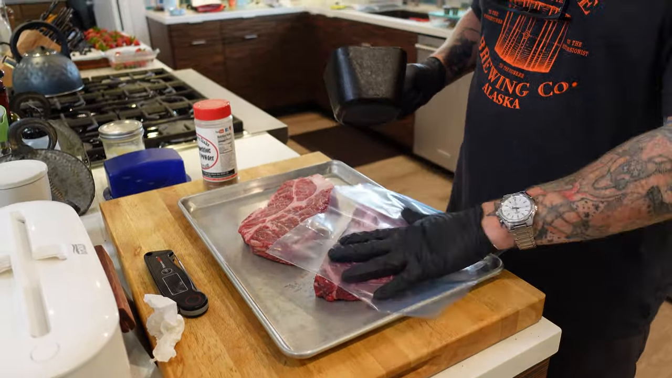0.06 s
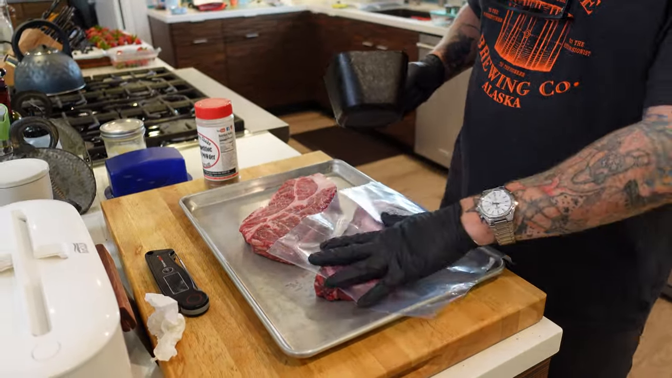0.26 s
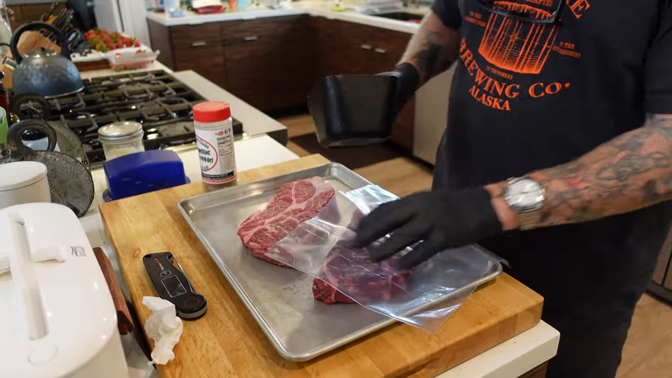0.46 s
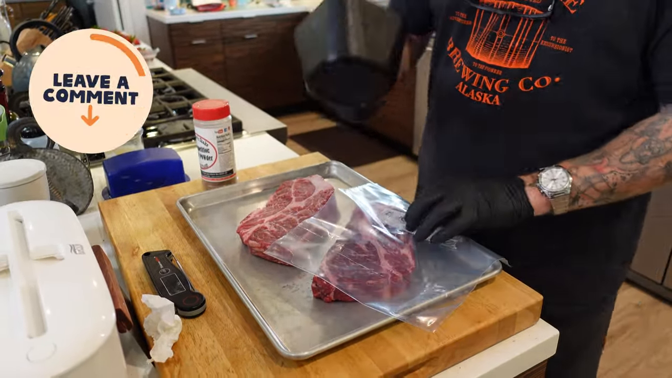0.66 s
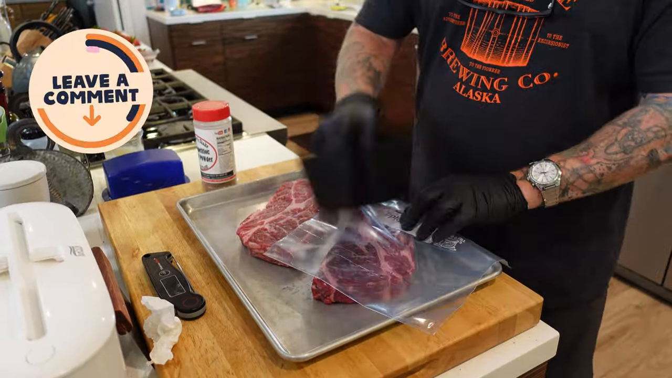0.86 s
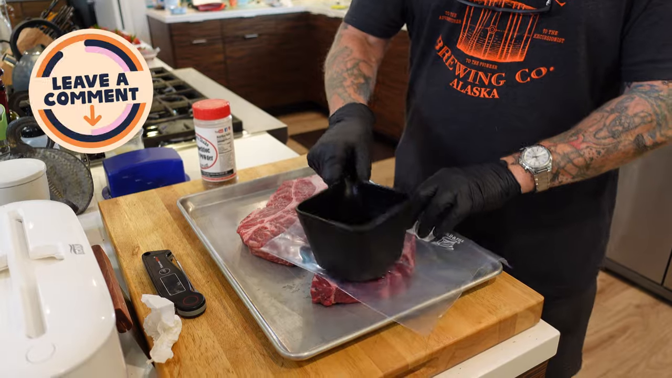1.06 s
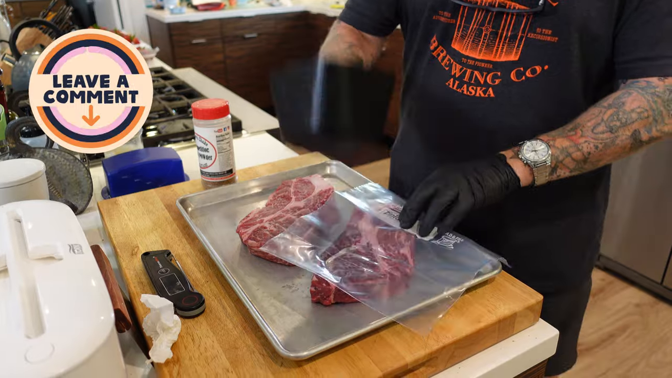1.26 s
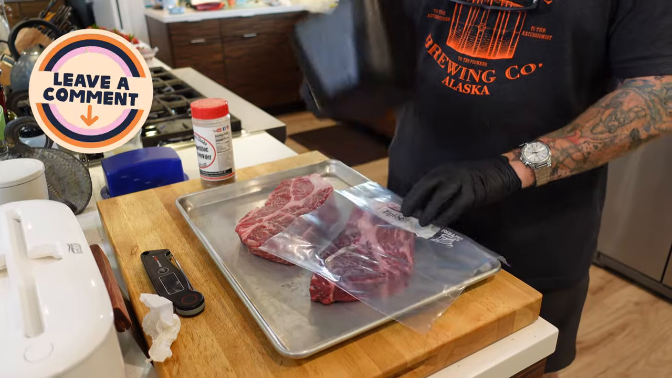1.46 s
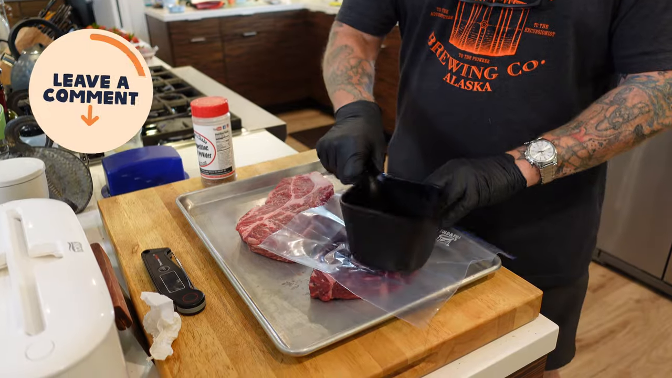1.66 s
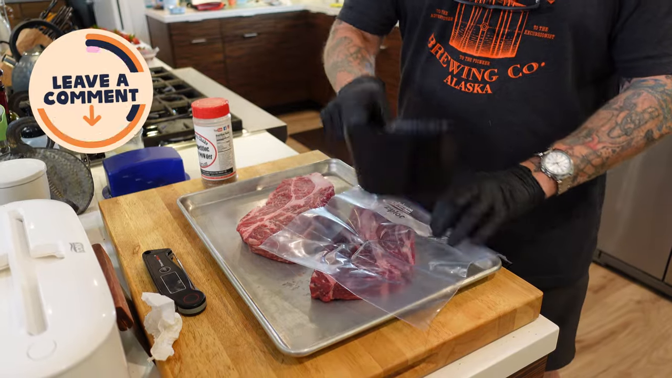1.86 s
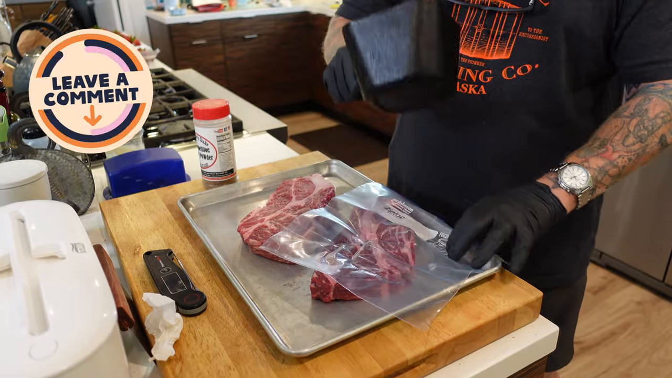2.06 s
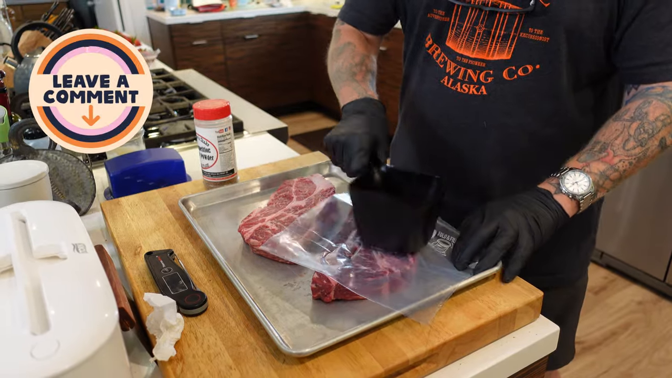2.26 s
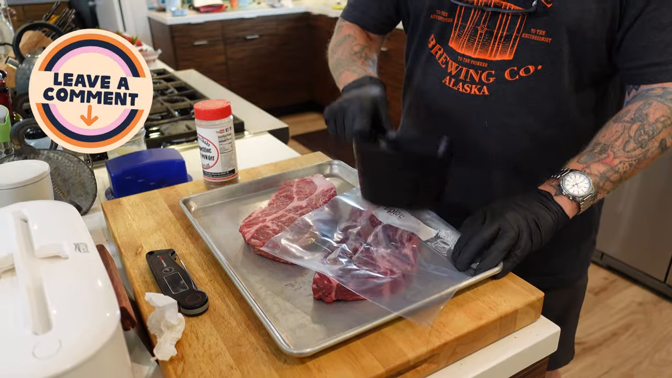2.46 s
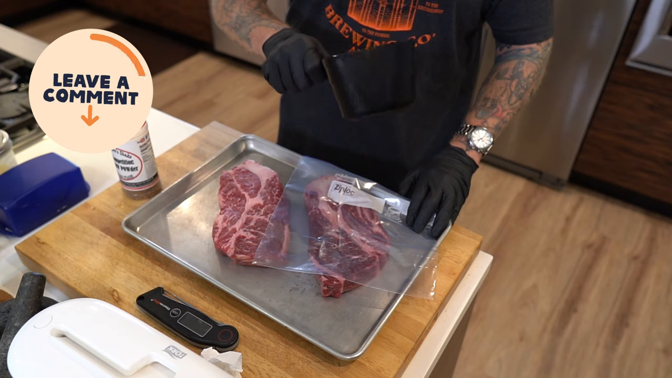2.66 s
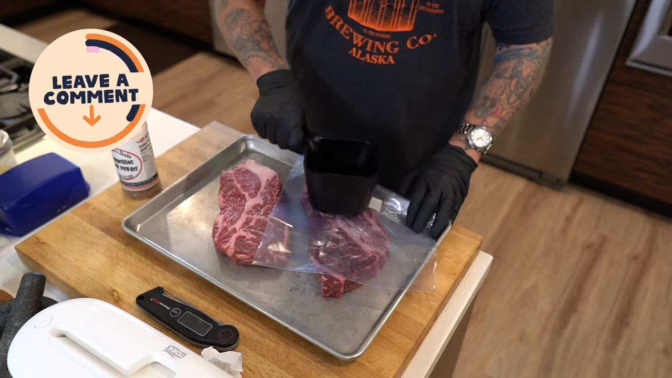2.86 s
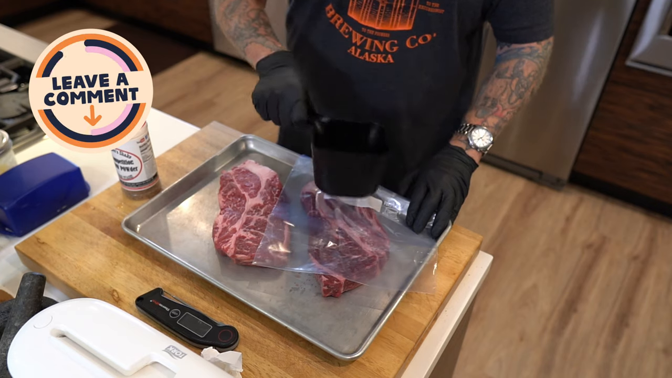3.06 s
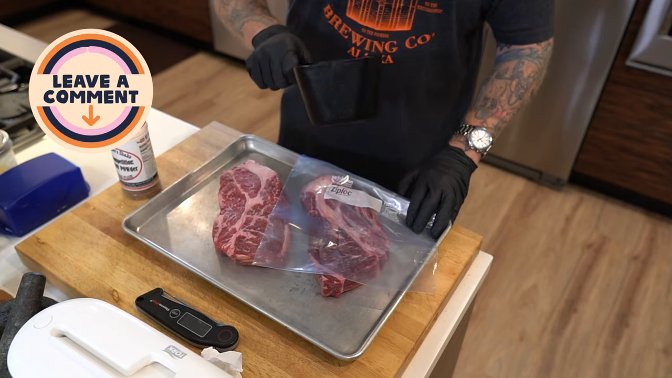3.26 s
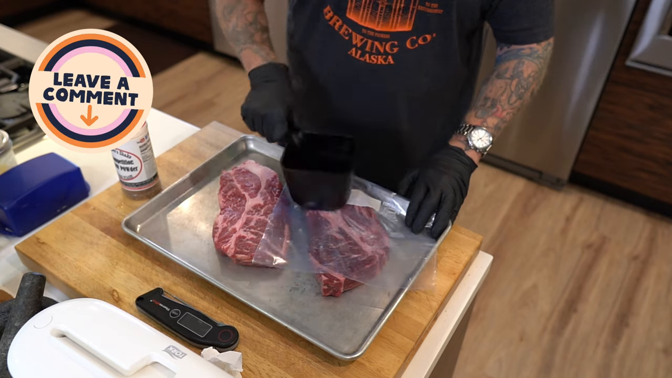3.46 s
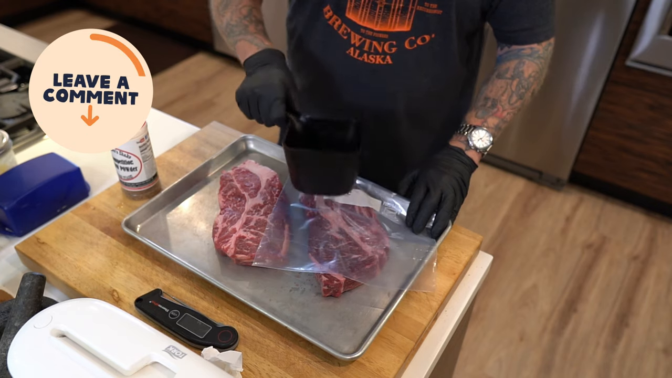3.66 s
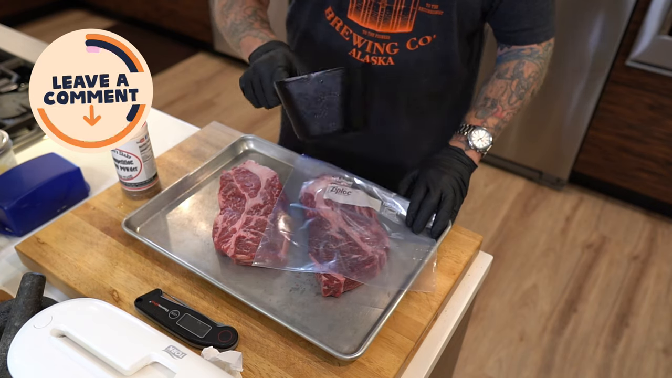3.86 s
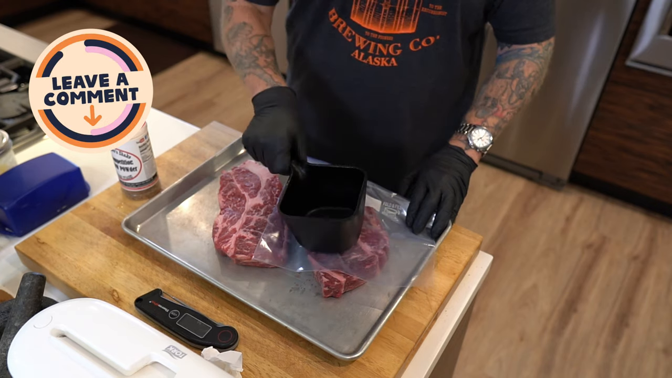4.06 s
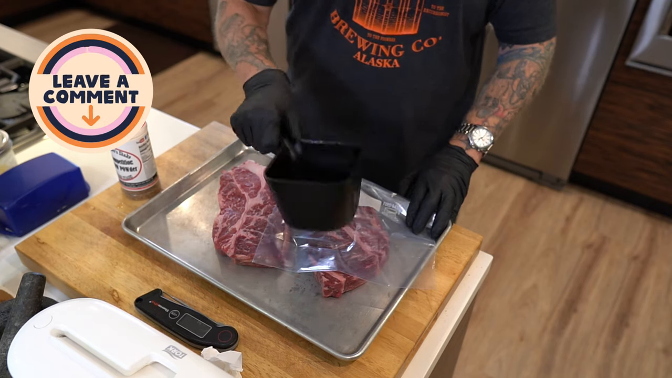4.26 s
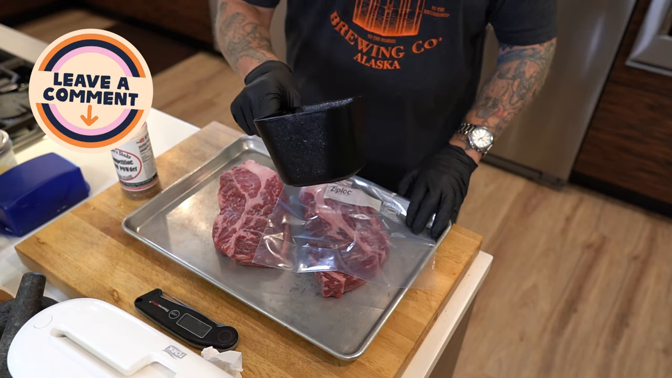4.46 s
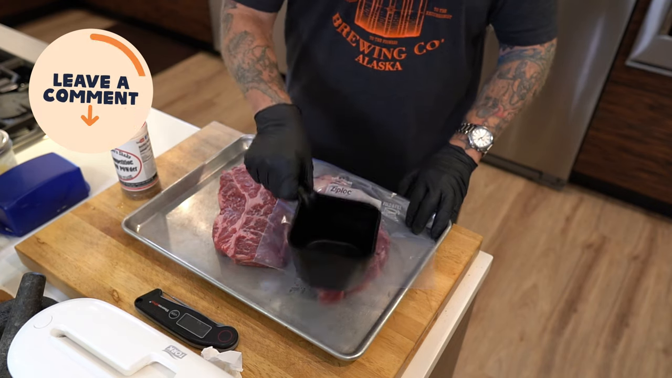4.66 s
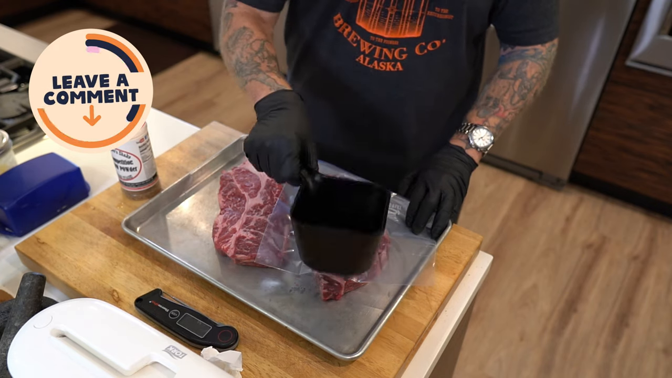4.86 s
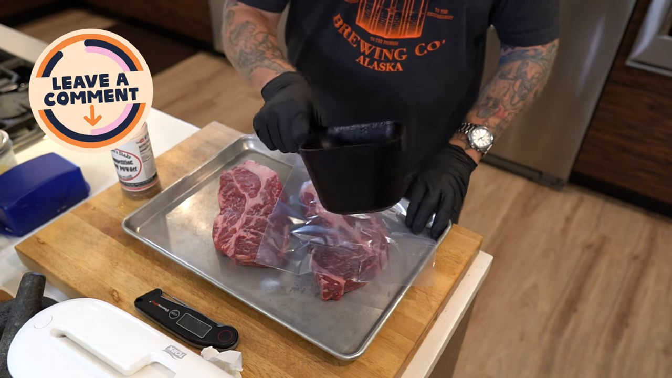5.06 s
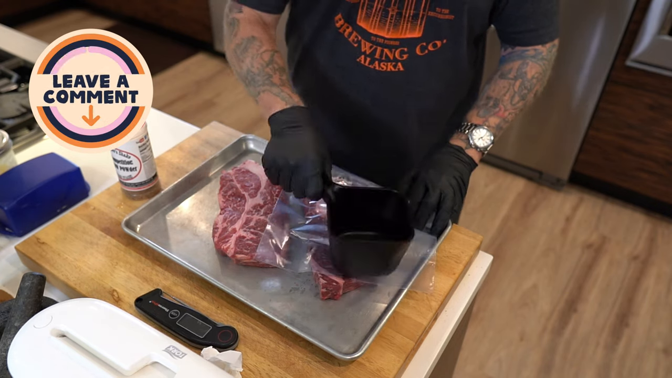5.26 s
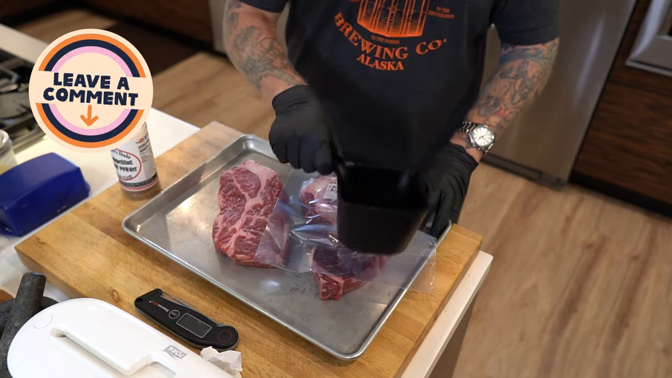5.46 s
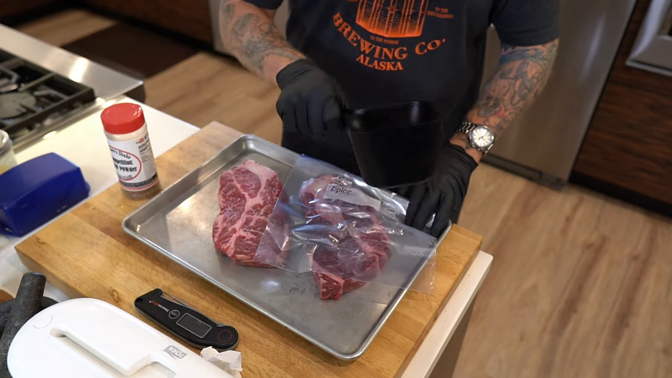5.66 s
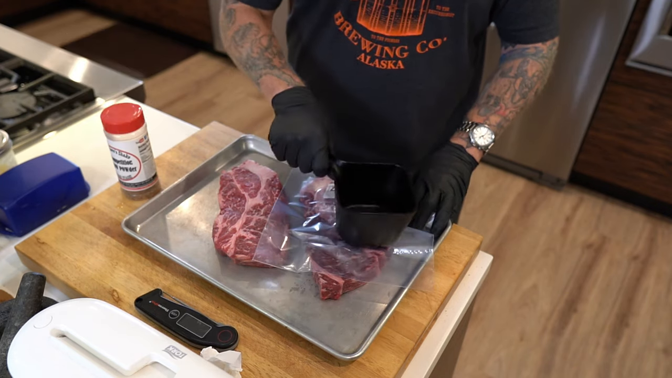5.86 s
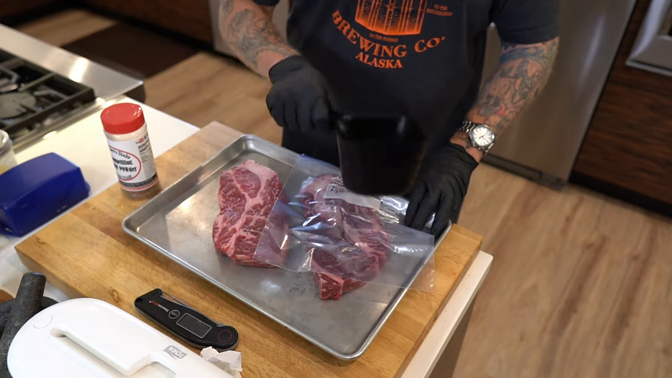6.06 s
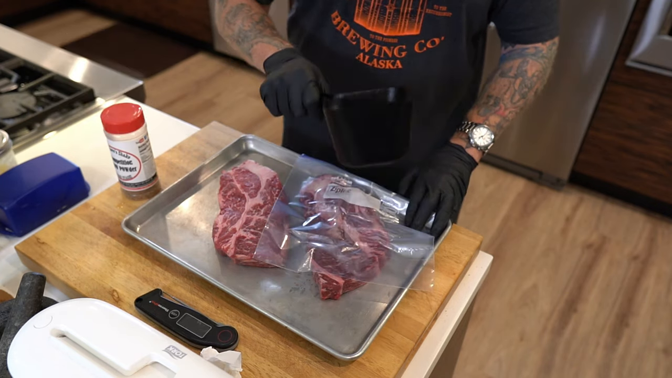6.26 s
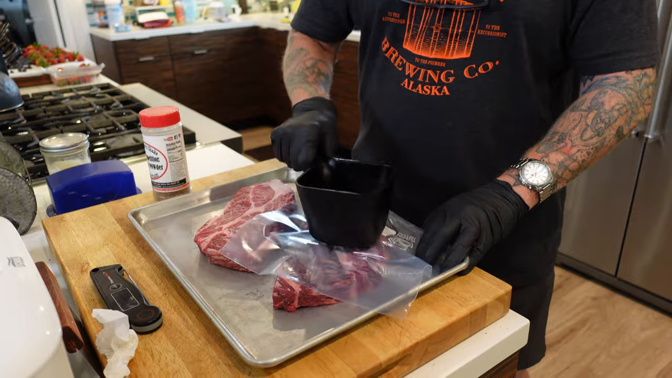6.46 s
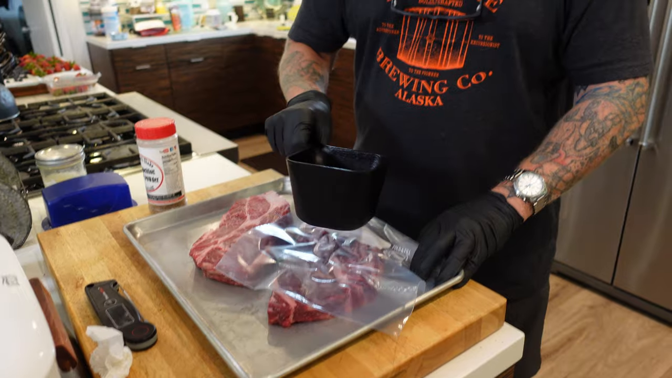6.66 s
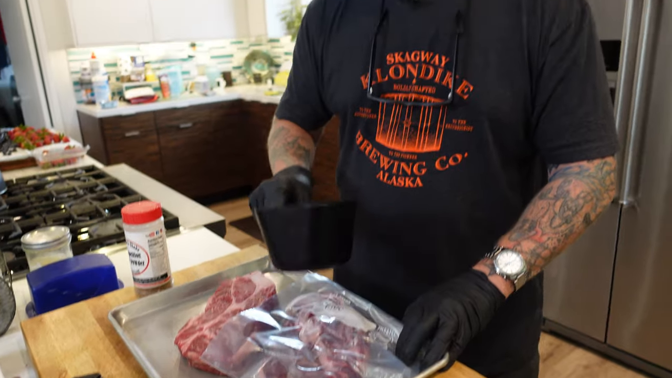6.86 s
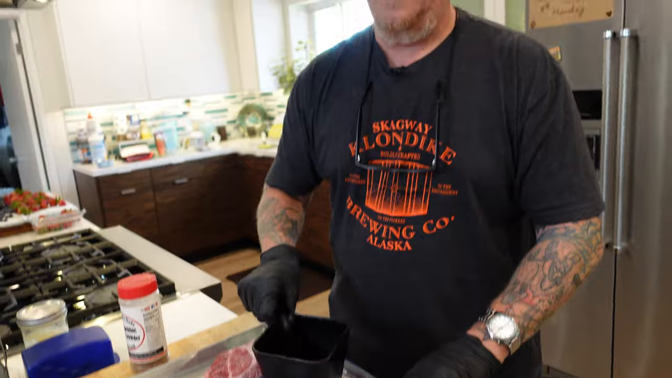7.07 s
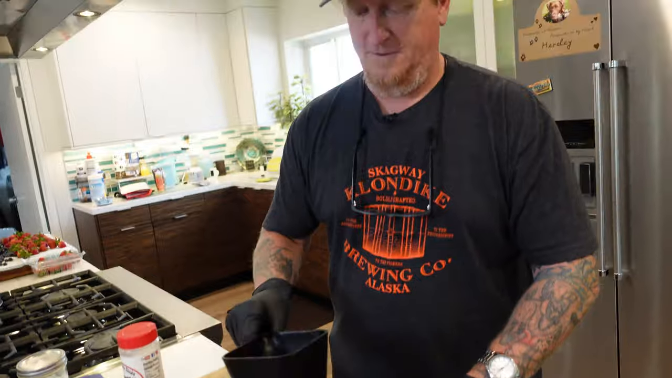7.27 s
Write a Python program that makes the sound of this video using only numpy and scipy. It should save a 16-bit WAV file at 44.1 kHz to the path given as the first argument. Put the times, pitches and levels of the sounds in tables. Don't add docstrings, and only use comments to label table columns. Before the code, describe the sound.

Close microphone on a kitchen counter: grainy plastic rustle, sharp crease snaps and dull pats on meat, over quiet room tone. From just before one second, steady heavy slaps land on bagged meat, dry and cracking on top, boxy in the middle, booming below, with short room reverberation. After the first, a soft falling suck of air leaves the bag. Occasional crinkles and a tiny glassy ring fill gaps; blows continue to the end.

```python
import sys
import numpy as np
from scipy import signal
from scipy.fft import rfft, irfft
from scipy.io import wavfile
from scipy.ndimage import uniform_filter1d, map_coordinates

SR = 44100
rng = np.random.default_rng(int(sys.argv[2]) if len(sys.argv) > 2 else 0)


def volts_from_db(level):
    exponent = np.asarray(level, float) / 20
    return 10 ** exponent


def generate_wav(sig):
    pcm = np.round(np.clip(np.atleast_2d(sig).T, -1, 1) * 32767).astype(np.int16)
    wavfile.write(sys.argv[1], SR, pcm)


N = 322646

# [f/Hz, level/dB per Hz]
ROOM_TONE = [(12, -31.5), (20, 1), (44, -2), (169, -12), (230, -9), (305, -12.5), (351, -8.5), (393, -16),
             (670, -16.5), (913, -25), (1210, -20.5), (1390, -28.5), (13900, -40), (15200, -37),
             (16500, -57.5)]
# [f/Hz, level/dB]
FRIDGE_LINES = [(27, -74), (60, -74), (114, -62.5), (168, -63.5)]
# [t/s, hold/s, hiss level/dB, body level/dB]
BAG_STROKES = [
    (0, .27, -58, -48),
    (.29, 0.099, -65, -49.5),
    (1.0, 0.1, -61, -49),
    (1.9, 0.25, -82.5, -55.5),
    (2.15, 0.055, -69.5, -54),
    (2.5, 0.13, -79.5, -56.5),
    (3.56, 0.19, -60.5, -50.5),
    (3.949, 0.055, -71.5, -62),
    (5.55, 0.18, -80.5, -55.5),
]
# [f/Hz, level/dB per Hz]
RUB_HISS = [(2500, -4.5), (4300, -9), (5300, -4), (6800, 2), (10000, -4.5), (11700, -8), (14500, -6),
            (16000, -7)]
RUB_BODY = [(180, -33), (300, 3), (441, -18.5), (678, -2.5), (734, -10), (975, -1), (4500, -21),
            (5850, -52.5), (9900, -120)]
# [f/Hz, level/dB per Hz]
PUFF_SPECTRUM = [(1300, -15), (2000, -3), (3500, 0.5), (4600, -7), (5500, -22), (12000, -40)]
# [t/s, peak level/dB, sheet f/Hz, treble level/dB]
CREASES = [(0.0237, -21.5, 1160, -5.5), (.1481, -25, 1270, -20), (0.157, -37.5, 3530, -27),
           (0.248, -36, 990, -18), (0.2878, -39, 1100, -22), (.633, -54, 1200, -13.5), (.71, -55, 4030, -4),
           (1.495, -30.5, 1090, -18), (1.946, -41, 1136, -15.5), (1.958, -44.5, 1110, -28),
           (1.971, -46.5, 1200, -28.5), (1.982, -49.5, 1500, -21.5), (2.0282, -28.5, 1165, -12.5),
           (2.0875, -42, 4020, -13.5), (2.1047, -25, 1480, -15), (2.1289, -37.5, 1101, -32.5),
           (2.145, -28, 4560, -3), (2.167, -43, 2930, -15), (2.528, -47.5, 5050, -12), (5.31, -25, 3930, 4),
           (5.885, -28, 4000, -12), (5.904, -27, 3380, -12), (6.041, -42, 2840, -16.5),
           (6.053, -36.5, 1560, -35), (6.491, -34.5, 4560, 3), (6.5289, -28.5, 3170, -11.5),
           (6.58, -40, 3530, -11), (6.6609, -30, 2600, -16), (6.841, -49, 1610, -8)]
# [t/s, level/dB]
PATS = [
    (.05, -44),
    (.125, -44),
    (.243, -33),
]
# [t/s, weight level/dB, rim level/dB, cup level/dB, tray level/dB]
IMPACTS = [(0.8469, -25, -11.5, -13, -15.5), (1.5632, -20, -6, -9.5, -13.5),
           (2.1977, -20.5, -8.5, -10, -13), (2.8287, -19.5, -7.5, -5, -14), (3.4293, -16, -2.5, -27.5, -19),
           (4.0232, -19, -14, -4.5, -10.5), (4.6495, -23.5, -22.5, -12.5, -11),
           (5.249, -22.5, -21, -10, -12), (5.7876, -25, -16, -17.5, -36), (6.383, -24, -16, -9.5, -14),
           (6.9425, -23.5, -12, -8, -20)]
# [bag lead-in t/s, brightness level/dB, bag squeak f/Hz, counter edge nearness level/dB]
LANDINGS = [(0.00271, 5, 8400, -11.5), (0.0033, 4, 12000, 1.5), (.0054, 5.5, 15000, 3.5),
            (.005, 2.5, 4600, 2), (.0055, 1, 6800, 1.5), (0.0039, 3.5, 7100, -1.5), (.006, 7, 6700, -3),
            (.014, 5.5, 3600, -1.5), (.007, 7, 8000, 1), (0.0044, 4.5, 3360, 3), (.00525, 0.5, 4500, 3.5)]
# [f/Hz, level/dB per Hz]
SLAP_SPECTRUM = [(410, -4.5), (700, -7), (1000, -11), (1370, -7), (2700, -14.5), (4640, -11), (6450, -21.5),
                 (7080, -14), (13900, -16), (15700, -21.5), (16500, -41)]
# [f/Hz, level/dB, t60/s]
RIM_MODES = [(1133, -5, 0.028), (1300, -2, 0.028), (1800, -12, 0.03), (1900, -11.5, 0.022)]
CUP_MODES = [(697, 5.5, 0.034), (785, -5, 0.047)]
TRAY_MODES = [(480.4, 1, 0.095), (523, -5, 0.19)]
MEAT_MODES = [(290, 1, 0.03), (363, -4, 0.031)]
# [f/Hz, level/dB per Hz]
ECHO_SPECTRUM = [(88, -13.5), (150, -2.5), (276, -6.5), (479, -1.5), (606, -5), (767, -4), (972, -10),
                 (1310, -8.5), (1410, -10), (1820, -15), (12500, -33), (15300, -41), (16500, -53)]
# [f/Hz, t60/s]
ROOM_DECAY = [(150, 0.58), (400, 0.52), (1000, 0.53), (3000, 0.54), (8000, 0.45), (15000, 0.42)]
# [f/Hz, level/dB]
ECHO_LUMPS = [(2000, 2), (6000, .8)]
# [t/s, f/Hz, level/dB, t60/s]
JAR_CHIMES = [
    (.852, 3600, -44, 0.19),
    (1.572, 3690, -30, 0.25),
    (2.835, 3700, -42, 0.21),
]
# [f/Hz, signed size at the microphone, t60/s]
LOW_MODES = [(41.5, 2.0, .19), (50.4, -2.5, .6), (63.8, 3.8, .2), (75.5, -2.6, .28), (86.3, 1.3, .32)]
UPPER_MODES = [(98.9, -2.3, .15), (115.8, -2.45, .27)]
# [f/Hz, level/dB, t60/s]
CUPBOARD_MODES = [(137.2, -0.5, 0.62), (162, -20.5, .25), (227.5, -5.5, 0.41), (390, -9.5, .12)]
# [f/Hz, level/dB per Hz]
FAR_ROOMS = [(40, -12), (90, -0.5), (130, -1.5), (250, -4.5), (500, -8), (1200, -16.5), (3000, -39.5)]
# [f/Hz, level/dB]
MICROPHONE = [(20, 0), (15700, 3), (16100, -11), (16700, -44.5), (16900, -77.5)]

FLOOR_DB = -54
SLIDE_ATTACK_S, SLIDE_T60_S = 0.018, 0.38
PUFF_S, PUFF_DB, PUFF_T60_S = 0.289, -53, 0.5
SNAP_T60_S, SNAP_ECHO_DB = 0.02, -17
USUAL_DB = -21
SLAP_DB, SLAP_GROWS, SLAP_T60_S, SLAP_DULL_DB, CRUSH_DB = -3, 0.37, 0.035, -13, -13
MIDDLE_DB, MIDDLE_GROWS, SQUEAK_DB, MEAT_DB = 1.8, 0.4, 6.5, -22
RING_IN_ECHO, USUAL_RING_DB = 0.2, -12
LUMP_BINS, LUMP_FRAMES = 3, 5
BOOM_DB, BOOM_GROWS, BOOM_LAG_S = -26, 0.6, 0.0078
PEEL_S, PEEL_LONG_S, PEEL_DB = 1.0, 0.18, -46
PEEL_HZ, PEEL_END_HZ, PEEL_WIDTH_HZ = 1210, 520, 260


def unit(x):
    return x / np.sqrt(np.mean(x ** 2) + 1e-20)


def along(points, hz):
    f, v = np.transpose(points)
    return np.interp(np.log(hz + 1), np.log(f + 1), v)


def noise(spectrum, size, treble_db=0):
    hz = np.fft.rfftfreq(size, 1 / SR)
    gain_db = along([(spectrum[0][0] / 2, -120)] + list(spectrum), hz)
    gain_db = gain_db + along([(2000, 0.0028), (11000, treble_db)], hz)
    return unit(irfft(rfft(rng.standard_normal(size)) * volts_from_db(gain_db), size))


def wobble(rate):
    knots = rng.standard_normal(int(N * rate / SR) + 4)
    return map_coordinates(knots, [np.arange(N) * rate / SR])


def ring(modes, t, scatter_db):
    total = 0
    for hz, db, t60 in modes:
        level_db = db + rng.normal(0, scatter_db) - 60 * t / t60
        total = total + rng.choice([-1, 1]) * volts_from_db(level_db) * np.sin(2 * np.pi * hz * t)
    return total


def tail(colour):
    hz, t, z = signal.stft(noise(ECHO_SPECTRUM, SR), SR, nperseg=256)
    z = z * volts_from_db(along(colour, hz)[:, None] - 60 * t / along(ROOM_DECAY, hz)[:, None])
    lumps = uniform_filter1d(rng.standard_normal(z.shape), LUMP_BINS, 0)
    lumps = uniform_filter1d(lumps, LUMP_FRAMES, 1)
    z = z * volts_from_db(along(ECHO_LUMPS, hz)[:, None] * unit(lumps))
    return signal.istft(z, SR, nperseg=256)[1][:SR]


def blank():
    return np.zeros(N + SR), np.arange(SR) / SR


def add(track, s, sound):
    track[round(s * SR):][:len(sound)] += sound


def kitchen():
    t = np.arange(N) / SR
    hum = 0
    for hz, db in FRIDGE_LINES:
        hum = hum + volts_from_db(db + 2 * wobble(9.6)) * np.sin(2 * np.pi * hz * t + 0.5 * wobble(5.4))
    return volts_from_db(FLOOR_DB - 4 + 0.95 * wobble(1.3)) * noise(ROOM_TONE, N) + hum


def slide():
    t = np.arange(N) / SR
    grain = volts_from_db(1.5 * wobble(300) + 0.7 * wobble(25))
    s, hold, hiss_db, body_db = np.transpose(BAG_STROKES)[..., None]
    rise = np.clip((t - s) / SLIDE_ATTACK_S + (s < 0.02), 0, 1)
    stroke = rise * volts_from_db(-60 * np.maximum(t - s - hold, 0) / SLIDE_T60_S)
    hiss = (volts_from_db(hiss_db) * stroke).sum(0) * noise(RUB_HISS, N)
    body = (volts_from_db(body_db - 6.0) * stroke).sum(0) * noise(RUB_BODY, N)
    puff = volts_from_db(PUFF_DB - 60 * np.abs(t - PUFF_S) / PUFF_T60_S) * (t > PUFF_S) * noise(PUFF_SPECTRUM, N)
    return grain * (hiss + body + puff)


def snaps():
    out, t = blank()
    tick_spectrum = [(1500, -4), (5000, 0), (9000, -4), (12000, -12), (16500, -20)]
    for s, db, hz, treble_db in CREASES:
        tick = volts_from_db(treble_db + 3 - 60 * t / 0.012) * noise(tick_spectrum, SR)
        resonance = [(hz * 0.39, -16), (hz, 0), (hz * 1.66, -12), (hz * 4, -30), (hz * 12, -60)]
        sheet = volts_from_db(-60 * t / SNAP_T60_S) * noise(resonance, SR)
        sheet = volts_from_db(-1.5) * sheet + ring([(hz, -4, SNAP_T60_S)], t, scatter_db=0)
        echo = volts_from_db(SNAP_ECHO_DB) * tail([(400, -12), (hz, 4), (12000, treble_db + 6)])
        add(out, s, volts_from_db(db - 5.0) * (tick + sheet + echo) * np.minimum(t / 0.00046, 1))
    return out[:N]


def pats():
    out, t = blank()
    for s, db in PATS:
        add(out, s, volts_from_db(db - 60 * t / 0.059) * np.sin(2 * np.pi * 85 * t))
    return out[:N]


def slap(t, lead, extra_db, bright_db):
    u = t - lead
    crush = volts_from_db(CRUSH_DB + 3 + 9 * np.minimum(u / lead, 0)) * (u < 0.002) * np.minimum(t / 0.0013, 1)
    crack = np.clip(u / 0.00058, 0, 1) * volts_from_db(-60 * np.abs(u) / SLAP_T60_S)
    level = volts_from_db(SLAP_DB + SLAP_GROWS * extra_db - 6.5)
    return level * (crush + crack) * noise(SLAP_SPECTRUM, SR, SLAP_DULL_DB + bright_db)


def struck_body(t, modes, db, delay, spread):
    push = rng.standard_normal(600) * np.sin(np.pi * np.minimum(t[:600] / spread, 1))
    body = signal.fftconvolve(ring(modes, t, scatter_db=1.5), push)[:SR]
    start = int(max(delay, 0) * SR)
    out = np.zeros(SR)
    out[start:] = volts_from_db(db) * body[:SR - start] / np.abs(body).max()
    return out


def blow_echo(u, extra_db, ring_db, bright_db, squeak_hz):
    tray, cup, rim = RING_IN_ECHO * (np.array(ring_db) - USUAL_RING_DB)
    middle = MIDDLE_DB + MIDDLE_GROWS * extra_db
    colour = [(330, 0.0055), (500, tray), (720, cup), (1200, rim), (1900, middle), (3000, 0.0065),
              (11000, bright_db)]
    squeak = [(squeak_hz * 0.85, -25), (squeak_hz, SQUEAK_DB), (squeak_hz * 1.15, -25)]
    swell = np.clip((u - 0.006) / 0.011, 0, 1) * (1 + volts_from_db(-60 * np.abs(u) / 0.023))
    return swell * (tail(colour) + tail(squeak))


def blows():
    out, t = blank()
    for (s, weight_db, rim_db, cup_db, tray_db), (lead, bright_db, squeak_hz, _) in zip(IMPACTS, LANDINGS):
        extra_db = weight_db - USUAL_DB
        hit = slap(t, lead, extra_db, bright_db)
        hit += struck_body(t, RIM_MODES, rim_db, lead - 0.002, 0.003)
        hit += struck_body(t, CUP_MODES, cup_db, lead + 0.002, 0.006)
        hit += struck_body(t, TRAY_MODES, tray_db, lead + 0.005, 0.012)
        hit += struck_body(t, MEAT_MODES, MEAT_DB, lead + 0.001, 0.006)
        wall = signal.fftconvolve(hit, rng.standard_normal(120) / 11)[:SR]
        echo = blow_echo(t - lead, extra_db, (tray_db, cup_db, rim_db), bright_db, squeak_hz)
        add(out, s - lead, hit + volts_from_db(weight_db) * echo)
        add(out, s - lead + 0.021, volts_from_db(-18.5) * wall)
    return out[:N]


def chimes():
    out, t = blank()
    for s, hz, db, t60 in JAR_CHIMES:
        pair = ring([(hz, db, t60), (hz + 14, db - 5, t60)], t, scatter_db=0.5)
        add(out, s, pair * np.minimum(t / 0.0065, 1))
    return out[:N]


def signed_modes(modes, t):
    return sum(size * volts_from_db(-60 * t / t60) * np.sin(2 * np.pi * hz * t) for hz, size, t60 in modes)


def booms():
    out, t = blank()
    low, upper = signed_modes(LOW_MODES, t), signed_modes(UPPER_MODES, t)
    soft = t[:300] * np.exp(-t[:300] / 0.0007)
    soft = soft / soft.sum()
    for (s, weight_db, *_), (*_, upper_db) in zip(IMPACTS, LANDINGS):
        cupboards = ring(CUPBOARD_MODES, t, scatter_db=1.5) * (1 - np.exp(-t / 0.019))
        far = volts_from_db(-16.0 - 60 * t / 2.5) * np.minimum(t / 0.062, 1) * noise(FAR_ROOMS, SR)
        boom = np.convolve(low + volts_from_db(upper_db) * upper + cupboards + far, soft)[:SR]
        add(out, s + BOOM_LAG_S, volts_from_db(BOOM_DB + BOOM_GROWS * (weight_db - USUAL_DB)) * boom)
    return out[:N]


def peel():
    u = np.clip((np.arange(N) / SR - PEEL_S) / PEEL_LONG_S, 0, 1)
    phase = 2 * np.pi * np.cumsum(PEEL_HZ + (PEEL_END_HZ - PEEL_HZ) * u ** 2) / SR
    band = wobble(PEEL_WIDTH_HZ) * np.sin(phase) + wobble(PEEL_WIDTH_HZ) * np.cos(phase)
    return volts_from_db(PEEL_DB) * np.sin(np.pi * np.sqrt(u)) * band


def scene():
    return (kitchen() + slide() + snaps() + pats() + blows() + chimes() + booms() + peel())[None]


def band_limit(x):
    return signal.sosfilt(signal.butter(12, 16800, fs=SR, output="sos"), x)


def record(dry):
    clipped = dry / (1 + np.abs(dry / 0.8) ** 6) ** (1 / 6)
    edged = irfft(rfft(clipped) * volts_from_db(along(MICROPHONE, np.fft.rfftfreq(N, 1 / SR))), N)
    return band_limit(edged)


dry = scene()
out = record(dry)
generate_wav(out)
```